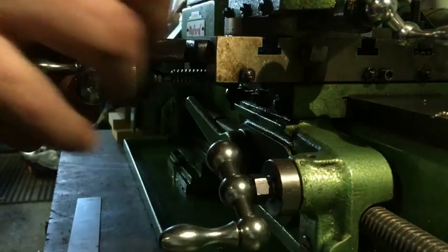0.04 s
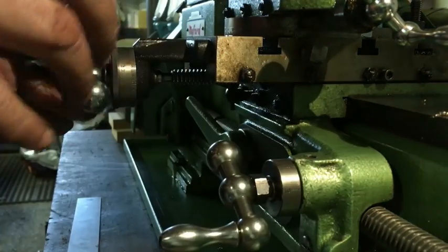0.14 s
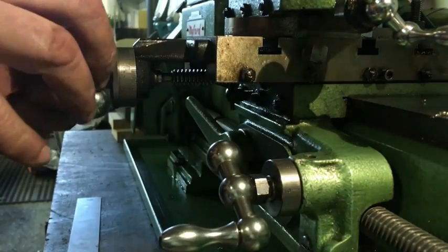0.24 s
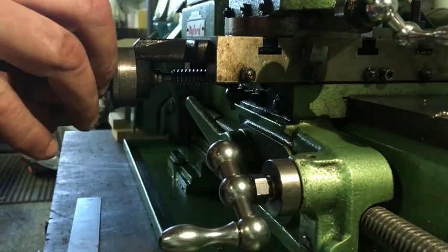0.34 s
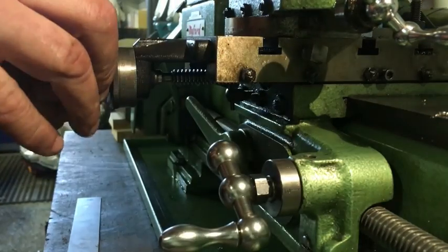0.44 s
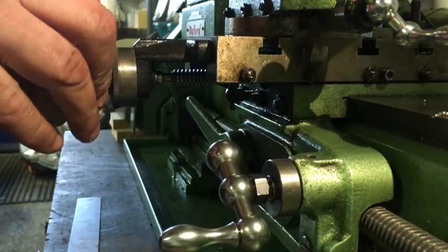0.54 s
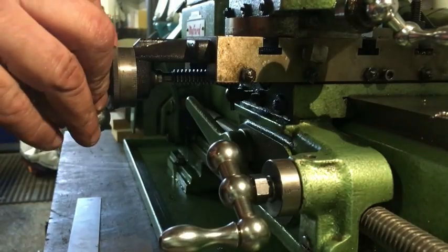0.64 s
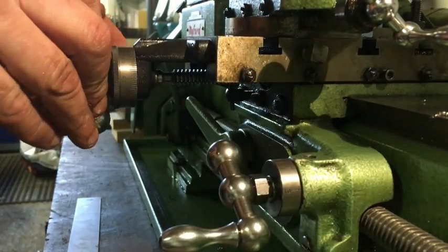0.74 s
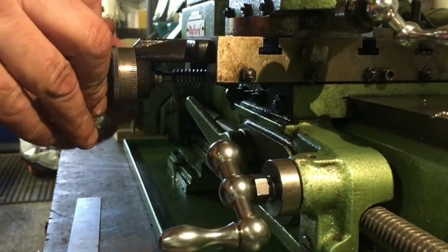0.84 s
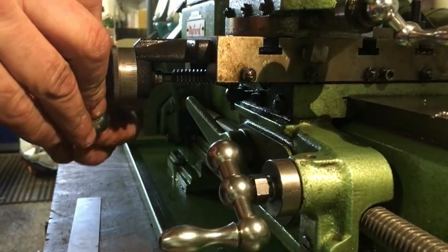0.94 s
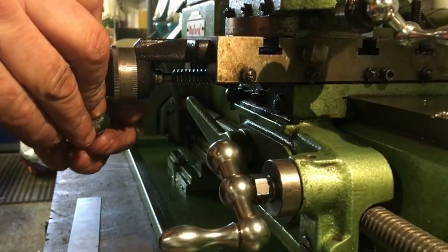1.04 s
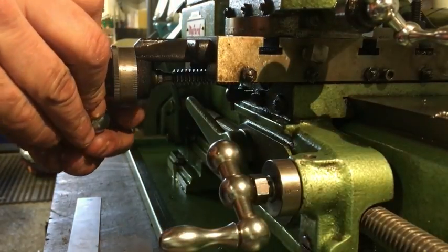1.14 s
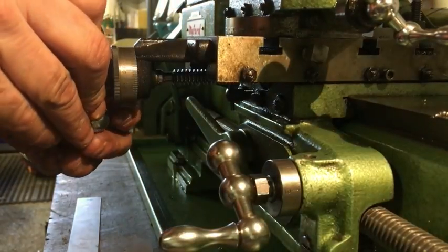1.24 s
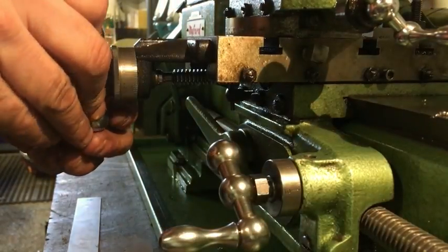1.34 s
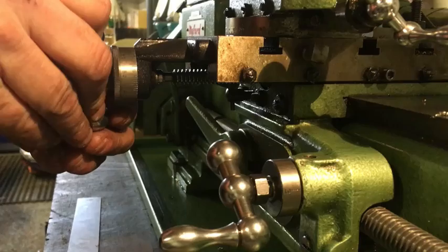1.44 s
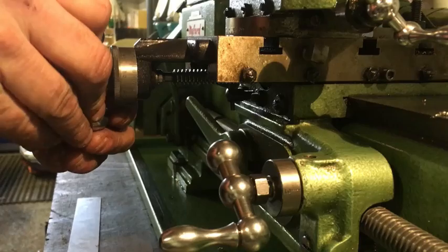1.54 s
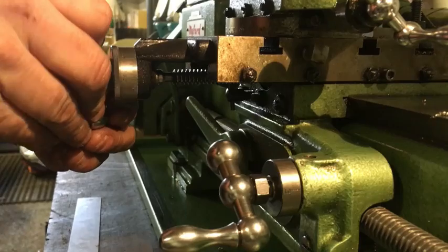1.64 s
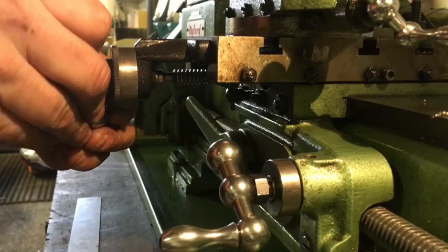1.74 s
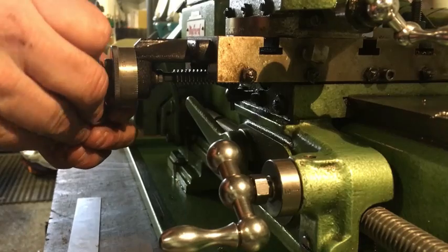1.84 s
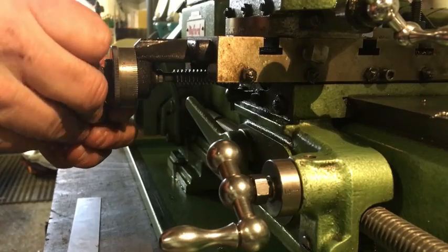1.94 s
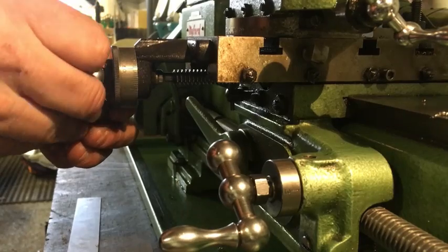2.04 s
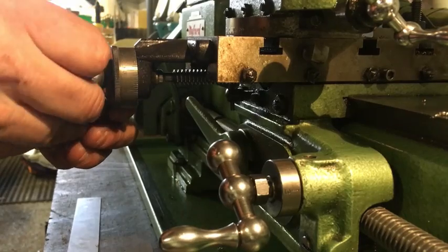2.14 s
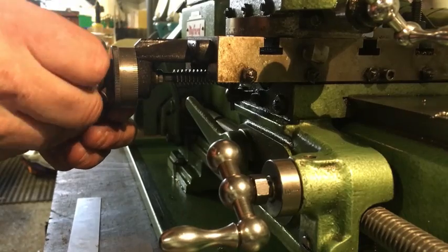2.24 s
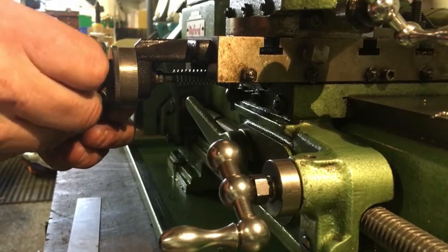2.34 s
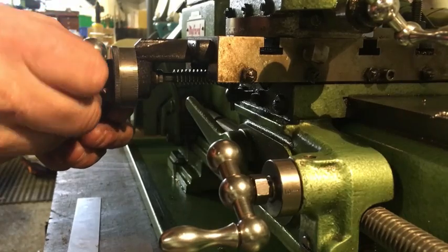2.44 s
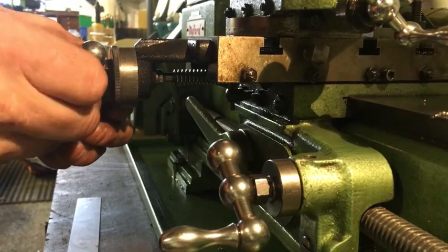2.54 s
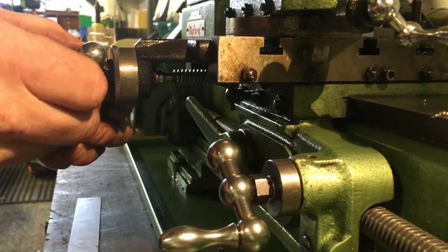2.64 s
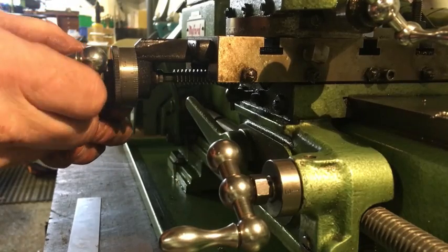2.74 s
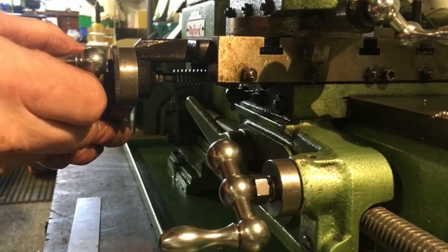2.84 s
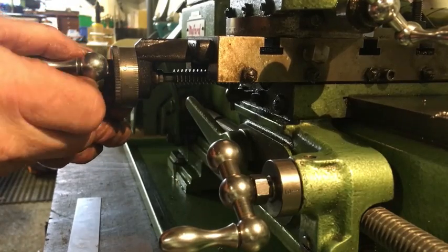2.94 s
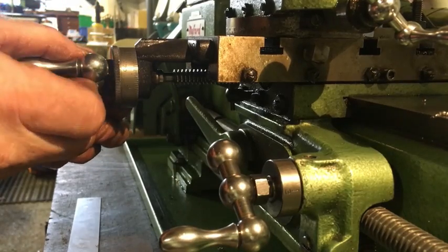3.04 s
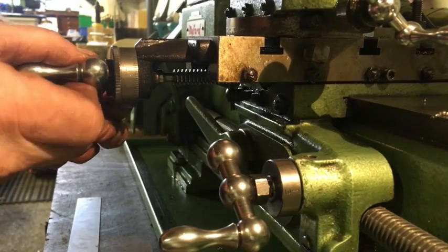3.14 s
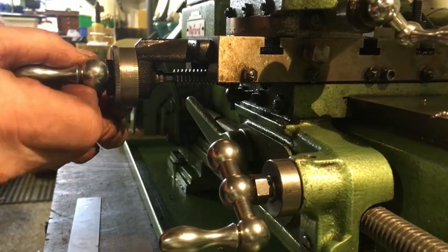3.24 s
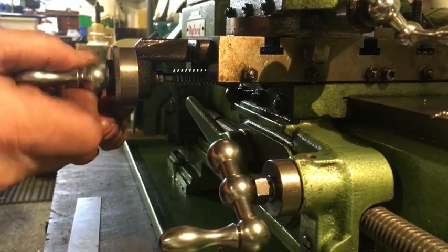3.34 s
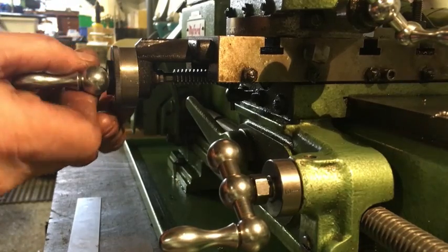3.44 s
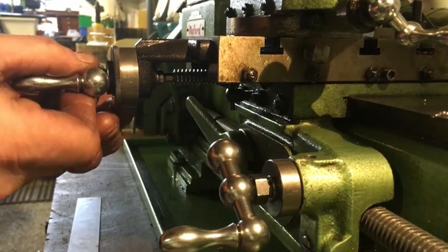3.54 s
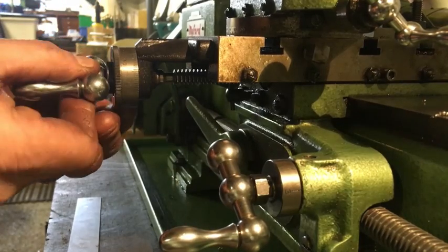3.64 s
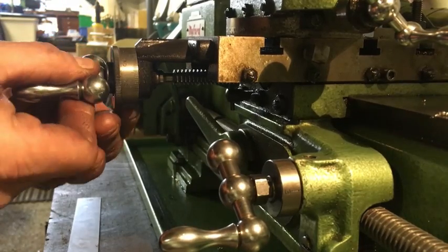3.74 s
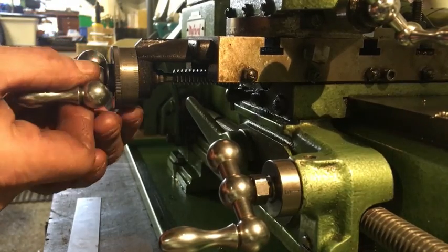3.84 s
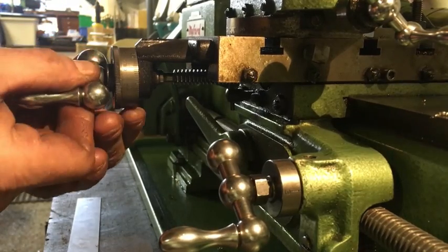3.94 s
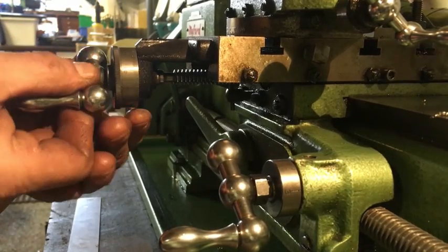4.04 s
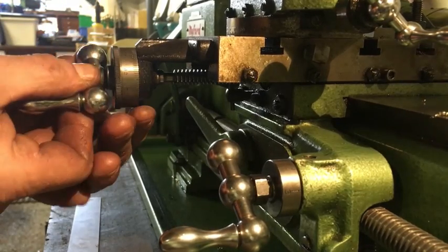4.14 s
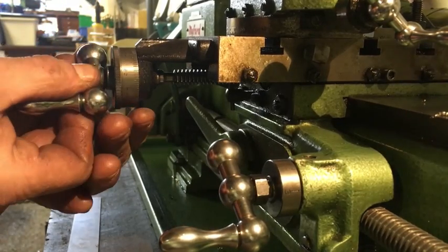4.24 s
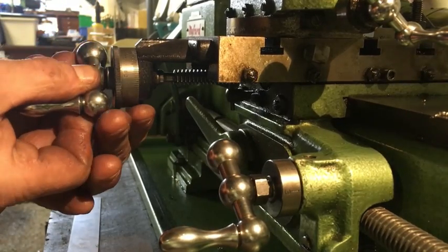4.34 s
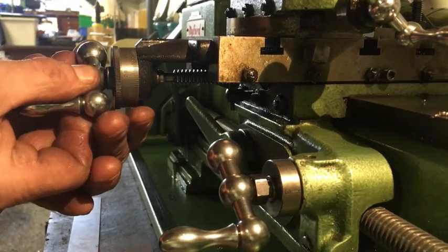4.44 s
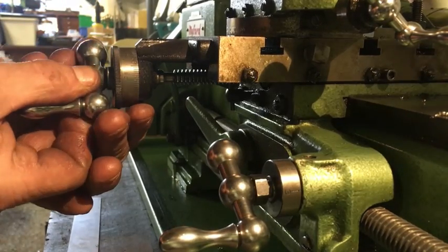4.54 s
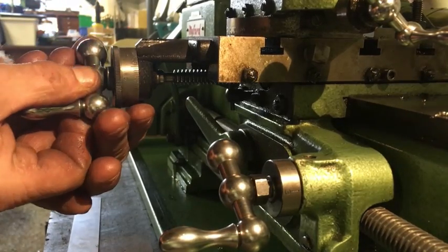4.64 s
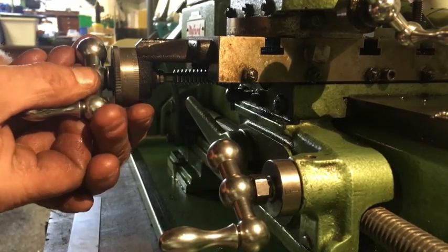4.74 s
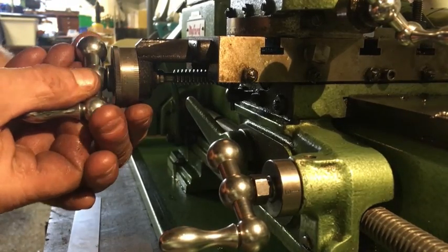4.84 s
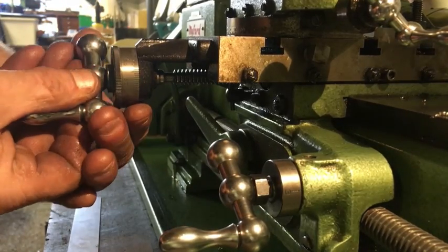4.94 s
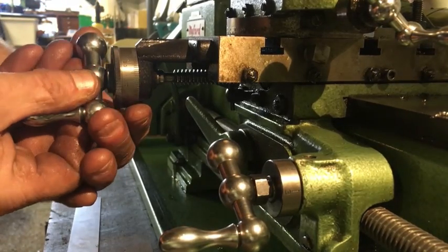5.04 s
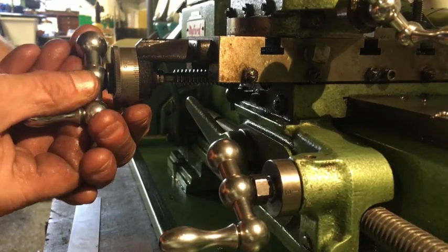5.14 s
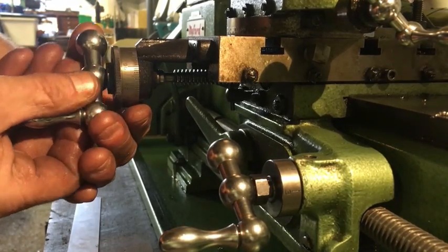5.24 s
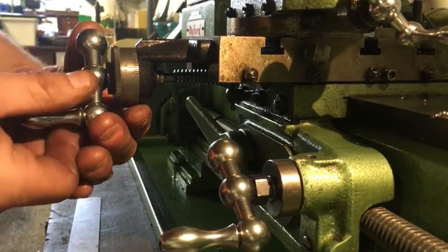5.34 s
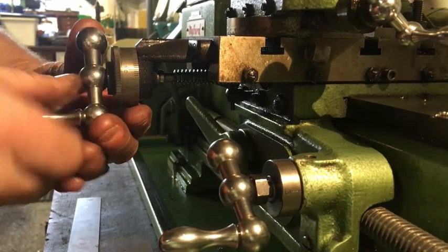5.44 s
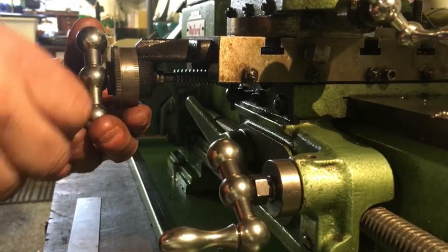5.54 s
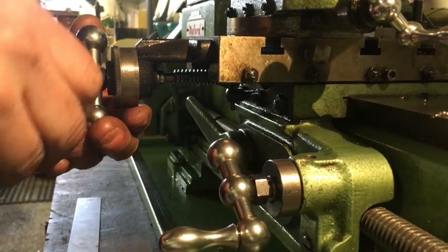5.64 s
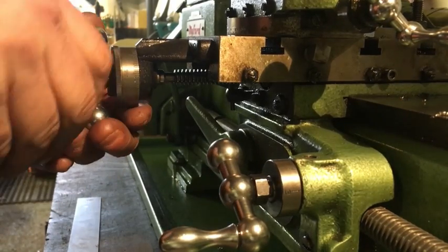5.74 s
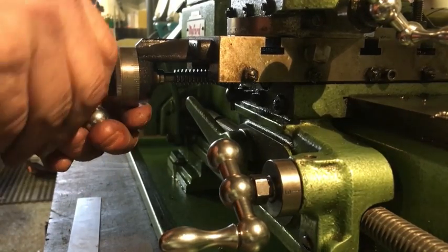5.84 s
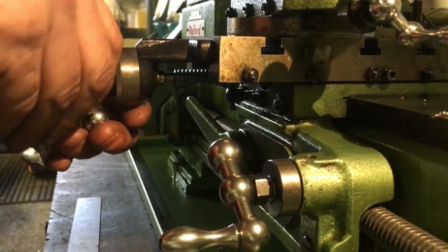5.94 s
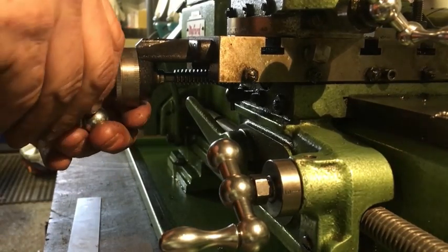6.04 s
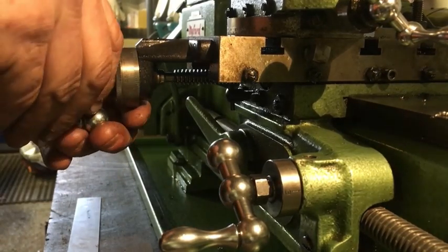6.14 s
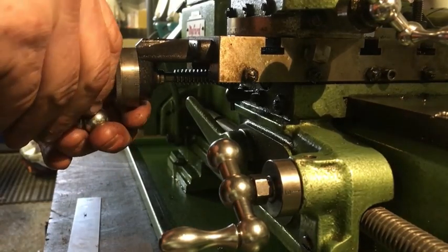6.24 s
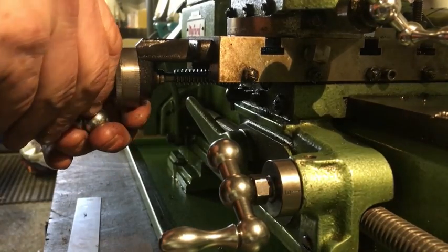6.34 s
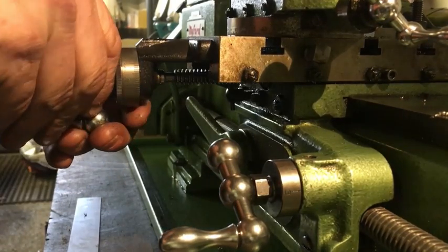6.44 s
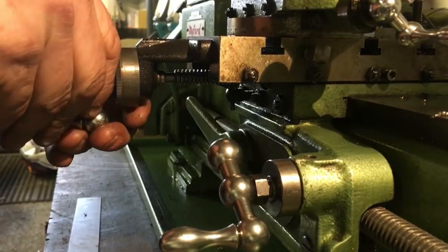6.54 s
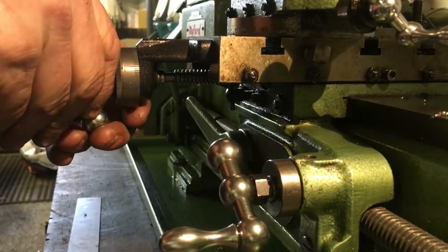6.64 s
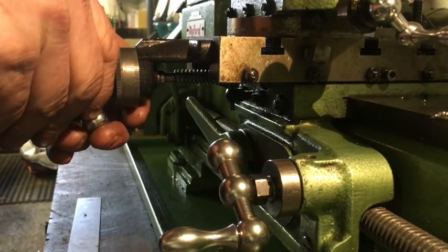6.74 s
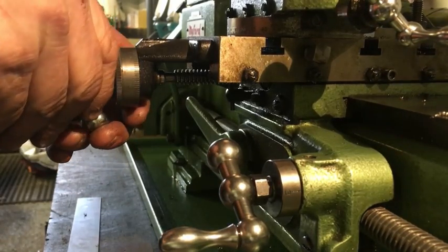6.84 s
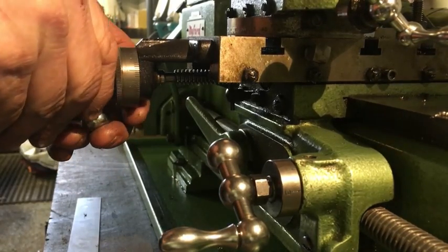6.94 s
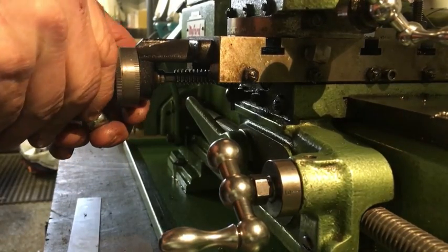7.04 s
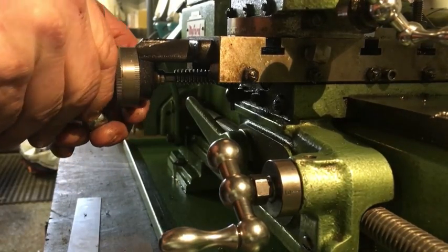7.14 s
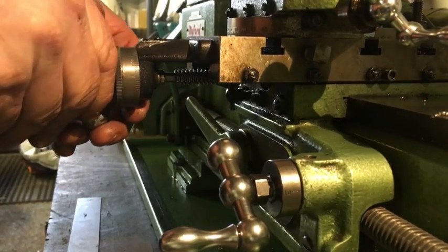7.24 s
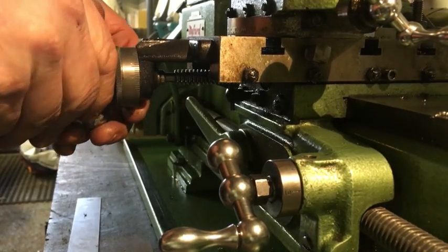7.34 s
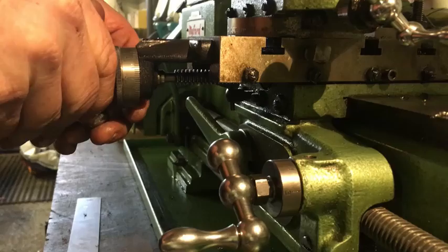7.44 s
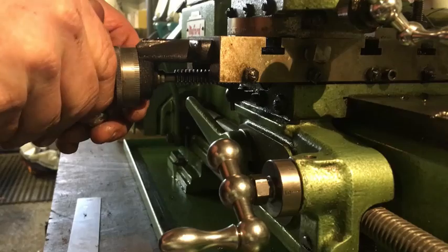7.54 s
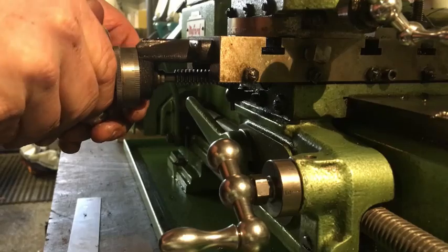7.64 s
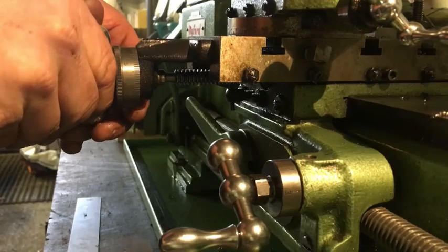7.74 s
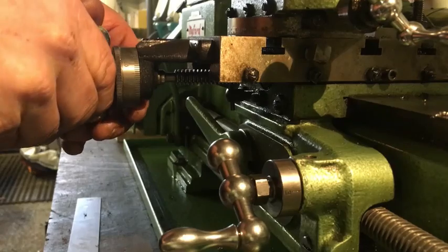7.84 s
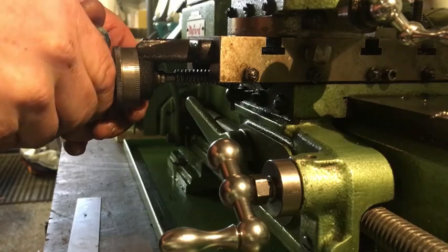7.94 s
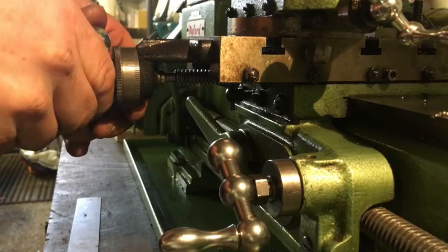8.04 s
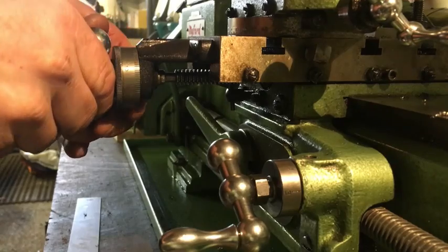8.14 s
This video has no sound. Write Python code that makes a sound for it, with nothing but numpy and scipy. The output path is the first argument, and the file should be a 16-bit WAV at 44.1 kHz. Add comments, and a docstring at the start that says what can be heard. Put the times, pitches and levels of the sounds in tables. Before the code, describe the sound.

A small metal lathe runs throughout, with a soft motor rumble, churning gears, a faint wavering whine and bearing hiss. At about 0.5 seconds the cutting tool starts catching a spinning steel bar once a turn, nearly five short bites a second. Each bite combines a low shudder, a rasping scrape, hiss and a shrill metallic ring. The bites grow louder by 1 second, then gradually lengthen. A curl of metal shaving brushes the bar with a thin hiss at about 2.3 and 3 seconds. Around 4 seconds the pulses merge into one steady, high-ringing cut that continues to the end at about 8 seconds. Tiny squeaks dot the cutting, and chips snap with small ticks around 5, 6.5 and 7.5 seconds. The microphone is close to the tool, and the small workshop adds only a very short echo.

```python
"""Motor and gears of a small lathe, running in a small workshop, the microphone close to the tool.
After half a second a hand slowly feeds the tool into an out-of-round steel bar. It bites only the high
side, once a turn; the bites lengthen and merge into one steady cut. The shearing chip shakes the bed,
scrapes, hisses, rings the tool near 6 kHz and now and then squeaks. Twice a curl of swarf brushes the
bar, and the walls give a short answer."""
import sys
import numpy as np
from scipy import signal
from scipy.fft import rfft, irfft, next_fast_len
from scipy.io import wavfile
from scipy.ndimage import map_coordinates

SR = 44100
rng = np.random.default_rng(int(sys.argv[2]) if len(sys.argv) > 2 else 0)


def file_out(sig):
    """Save sig as 16-bit WAV at sys.argv[1]."""
    # one column per channel
    cols = np.atleast_2d(sig).T
    # limit, then scale
    lim = np.clip(cols, -1, 1)
    pcm = np.round(lim * 32767).astype(np.int16)
    wavfile.write(sys.argv[1], SR, pcm)


N = 360738


def cutting(depth):
    """The chip shears off in dense slips, which drive the bed, the slide, the chip itself and the tool."""
    # load on the tool, as relative levels: time_s, shake_db, scrape_db, ring_db, upper_over_lower_db
    load = [(.54, -47, -41.5, -41, 0), (.72, -36.5, -45, -33, 2), (.96, -32, -40.5, -31, -2),
            (1.4, -32.5, -41, -31, -2.5), (2.05, -35, -41.5, -30.7, -4.5), (3.1, -34.5, -42.5, -32.5, -2),
            (4.2, -35, -42, -34, 1.5), (4.85, -34, -39.5, -32, 4), (5.5, -34, -40, -30.8, 4),
            (6.1, -36.5, -39.5, -32.5, 1), (7.1, -34.5, -39.2, -31.8, 2.5), (8.1, -35.5, -39, -33, .6)]
    shake_db, scrape_db, ring_db, upper_db = curves(load)
    jolt = chip_snaps()
    shear = slips(per_s=9000, spread_db=1.5) * amp(0.78 * wobble(130) + 0.25 * wobble(18))
    force = depth * shear
    return (bed_shake(shear, jolt, shake_db) + slide_scrape(force, jolt, scrape_db)
            + chip_hiss(force, scrape_db) + tool_ring(force, jolt, ring_db, upper_db))


def contact(linger_s=0, first_touch_s=.535):
    """Share of the full chip, 0-1: one bite a turn, ever longer until the bites join."""
    # the hand feeds the tool deeper (above 1 the bites overlap): time_s, share_of_turn_in_metal
    feed = [(.535, .005), (.728, .21), (.928, .27), (1.99, .47), (2.63, .61), (3.49, .75), (3.72, 0.86),
            (4.15, 1.01), (4.4, 1.2)]
    # the spindle slows a little under the cut: time_s, turn_s
    turns = [(.535, .193), (.728, .2), (.928, .212), (1.99, .212), (2.63, .219), (3.28, .214), (3.92, .217)]
    depth, start = np.zeros(N), first_touch_s
    while start < N / SR:
        turn_s = np.interp(start, *np.transpose(turns))
        bite_s = turn_s * np.interp(start, *np.transpose(feed))
        depth += window(start, start + bite_s + linger_s, attack_s=0.013, release_s=0.022)
        start += turn_s
    return np.minimum(depth, 1)


def slips(per_s, spread_db):
    """Tiny force steps at random moments and of random sizes, rms 1."""
    slipping = rng.random(N) < per_s / SR
    steps = slipping * rng.standard_normal(N) * amp(spread_db * rng.standard_normal(N))
    return steps / np.sqrt(np.mean(steps ** 2) + 1e-20)


def chip_snaps(decay_s=0.0062):
    """Force gained as the chip snaps off: it jumps and dies away."""
    # jolts of the cutting force: start_s, above_steady_db
    snaps = [(4.217, 6), (4.852, 9.5), (4.88, 7), (5.073, 7.5), (5.258, 7), (6.436, 9), (6.656, 6),
             (7.41, 8.5), (7.631, 9)]
    t = np.arange(N) / SR
    return sum((amp(db) - 1) * (t >= s) * np.exp(-np.abs(t - s) / decay_s) for s, db in snaps)


def tool_ring(force, jolt, ring_db, upper_db):
    """The tool is close to ringing by itself, so each group of its modes flares and sinks quickly."""
    # the tool's broad responses: frequency_hz, level_db
    lower_body = [(3500, -61.5), (4800, -23), (5200, -12.5), (5600, -4.5), (6200, 1), (6400, -3),
                  (6800, -22), (9000, -56.5)]
    upper_body = [(4500, -51), (6000, -20), (6400, -1), (6600, -0.5), (6880, -0.5), (7200, -10), (7500, -8),
                  (8200, -31.5), (11000, -54)]
    # its two groups of modes: pitch_hz, width_hz, rise_db
    lower_modes = [(5250, 70, 13.6), (5460, 96, 3.7), (5580, 87, 9.8), (5855, 67, 6), (6086, 87, 7.2),
                   (6250, 60, 2.9), (6500, 60, 5)]
    upper_modes = [(6260, 44, 3), (6560, 70, 10.6), (6780, 67, 3.8), (6700, 60, 5.6), (6920, 86, 7.1),
                   (7100, 70, 5.4), (7470, 93, 6.5)]
    flare = lambda: amp(ring_db - 0.5 + 1.73 * wobble(120))
    lean = np.arctan(amp(upper_db))  # the contact point shifts the ring between the groups
    lower = resonate(force * (1 + jolt) * flare() * np.cos(lean), lower_body, lower_modes)
    upper = resonate(force * flare() * np.sin(lean), upper_body, upper_modes)
    return lower + upper


def bed_shake(shear, jolt, shake_db):
    """The heavy bed answers a moment after the tool and shakes on briefly after each bite."""
    # the bed's broad response: frequency_hz, level_db
    body = [(40, -37), (150, -22.5), (200, -10.5), (260, -6.5), (350, 0.5), (450, -5.5), (600, -10.5),
            (750, -12), (1100, -38.5), (2500, -66)]
    # its resonances: pitch_hz, width_hz, rise_db
    modes = [(187.5, 33, 4), (241, 39, 10.5), (313.4, 31, 3.5), (351, 56, 1.5), (390, 41, 8),
             (480, 34, 4.5), (536, 29, 4), (574, 39, 5)]
    force = contact(linger_s=0.0065) * shear * (1 + 0.52 * jolt)
    gain = amp(shake_db + .7 * wobble(9) + 1.48 * wobble(55))
    return later(resonate(force * gain, body, modes), delay_s=0.00503)


def slide_scrape(force, jolt, scrape_db):
    """The cutting force sounds through the slide as a midrange scrape."""
    # the slide's broad response: frequency_hz, level_db
    body = [(300, -20.5), (600, -3.5), (760, 2), (930, 2), (1100, 1.5), (1260, -1), (1700, -4), (2400, -1),
            (3100, -3), (4200, -1.5), (5000, -1.5), (6000, -27.5), (9000, -43.5)]
    # its resonances: pitch_hz, width_hz, rise_db
    modes = [(955, 130, 3), (1149, 77, 12.6), (1602, 95, 9.2), (1857, 80, 9.3), (2010, 115, 4.2),
             (2468, 124, 6.3), (2712, 142, 10.7), (2861, 66, 10.7), (3304, 84, 8.5), (3513, 150, 7),
             (3840, 320, 9.8), (4420, 73, 9.1), (4660, 86, 6.6)]
    gain = amp(scrape_db - .5 + 1.11 * wobble(35))
    return resonate(force * (1 + jolt) * gain, body, modes)


def chip_hiss(force, scrape_db):
    """The chip hisses; early copies off the carriage comb its colour at the microphone."""
    # the chip's broad response: frequency_hz, level_db
    body = [(4000, -39), (6800, -11), (7500, -2.5), (8800, 1), (9900, 1), (10700, 0), (11300, -3.5),
            (12600, -4.5), (13700, -14.5), (14500, -12), (15100, -5), (15700, -8)]
    # its resonances: pitch_hz, width_hz, rise_db
    modes = [(7800, 110, 5.4), (8120, 150, 6.4), (8530, 95, 6.5), (8800, 88, 1.9), (9150, 150, 6.7),
             (9430, 320, 9.1), (10045, 260, 7.2), (10400, 190, 4.7), (11980, 290, 8.6), (12300, 200, 7.6),
             (13070, 250, 6)]
    # reflections off nearby steel faces: delay_s, level_db
    faces = [(.00175, -11), (.00245, -10), (.00286, -14), (.0052, -14)]
    gain = amp(-28.5 + .28 * scrape_db + 0.71 * wobble(30))
    hiss = resonate(force * gain, body, modes)
    return hiss + sum(amp(db) * later(hiss, s) for s, db in faces)


def tip_squeaks(depth, per_s=2.2):
    """Loud, brief squeaks at set moments, and weaker ones at random while the tool is in the metal."""
    # the tip's loud squeaks: peak_s, relative_db, pitch_hz, length_s
    loud = [(.734, -23, 6770, 0.0051), (.951, -17, 5940, 0.0033), (.975, -24.5, 6210, 0.016),
            (1.575, -24, 6450, .0056), (1.611, -19, 6090, .006), (1.785, -24, 6441, .0056),
            (2.069, -21.5, 5820, .0091), (2.464, -22, 6040, 0.0045), (4.003, -24, 6000, .006),
            (4.883, -25, 6500, 0.0071), (5.543, -20.5, 6060, 0.0051), (6.123, -20.5, 6130, 0.0066),
            (6.219, -22.5, 6130, .0042), (6.66, -20, 6380, .0038), (7.386, -24, 6130, .005),
            (7.734, -24, 6310, .0056)]
    loud_squeaks = stick_slip(loud)
    count = round(per_s * N / SR)
    peak_s = np.sort(rng.random(count)) * N / SR
    level, pitch, length = rng.standard_normal((count, 3)).T
    weak = np.transpose([peak_s, -29.5 + 2 * level, 6300 * np.exp(0.047 * pitch),
                         .0055 * np.exp(.35 * length)])
    return loud_squeaks + depth * stick_slip(weak)


def stick_slip(rows, waver=0.015, octave_db=-21, trim_db=-2.05):
    """The tip sticks and slips in step with its own ring for a few dozen cycles."""
    t = np.arange(N) / SR
    peak_s, level_db, pitch_hz, length_s = np.transpose(rows)
    swell = np.zeros(N)
    for s, db, span in zip(peak_s, level_db, length_s):
        near = slice(max(0, int((s - .03) * SR)), int((s + .03) * SR))
        swell[near] += amp(db) * np.exp(-2 * ((t[near] - s) / (span + 0.0007)) ** 2)
    hz = np.interp(t, peak_s, pitch_hz) * (1 + waver * wobble(600))
    phase = 2 * np.pi * np.cumsum(hz) / SR
    return amp(trim_db) * np.sqrt(2) * swell * (np.sin(phase) + amp(octave_db) * np.sin(2 * phase))


def swarf(fade_s=.015):
    """A loose curl of swarf hisses and sings thinly while it rubs the turning bar."""
    # the curl touches and lets go: start_s, end_s, level_db
    brushes = [(2.34, 2.364, -43.5), (2.93, 3.07, -42)]
    # its broad response: frequency_hz, level_db
    body = [(3000, -42), (5400, -14), (6500, 4), (7600, -8), (9500, -6), (11000, -8), (12400, -6),
            (13200, -24), (15700, -30)]
    # its resonance: pitch_hz, width_hz, rise_db
    modes = [(12060, 450, 14)]
    rub = sum(amp(db) * window(start, end, fade_s, fade_s) for start, end, db in brushes)
    return resonate(rub * amp(1.2 * wobble(90)) * rng.standard_normal(N), body, modes)


def drive_train():
    """Under the cut the motor rumbles, the bearings hiss, the gears churn and whine a little unsteadily."""
    # noise colours of motor, gears and bearings: frequency_hz, relative_db
    motor = [(20, -20), (32, -13), (48, -4), (82, -2), (113, -0.5), (145, -10.5), (220, -27), (600, -70)]
    gears = [(120, -32.5), (185, 0), (280, -9.5), (380, 4), (450, -5), (570, -2.5), (820, -10), (1350, -11),
             (1700, -20), (2200, -11), (3000, -17), (3600, -13.5), (4900, -22.5), (7000, -54)]
    bearings = [(4000, -44), (5100, -16), (5750, 0.5), (6450, -2.5), (7350, 1.5), (7750, -11), (8400, -8),
                (9500, -6), (10700, -19), (11900, -10), (12500, -18), (15700, -24)]
    # tones of the running machine: pitch_hz, level_db
    whines = [(113, -64.5), (245, -63), (391, -56), (581, -58), (1998, -65), (2153, -65), (3618, -70),
              (5662, -63), (5912, -59.5), (7236, -72), (7382, -57.5), (8000, -78)]
    t = np.arange(N) / SR
    rumble = amp(-53) * resonate(rng.standard_normal(N), motor)
    churn = amp(-49.5 + wobble(14)) * resonate(rng.standard_normal(N), gears)
    hiss = amp(-49 + 0.72 * wobble(29)) * resonate(rng.standard_normal(N), bearings)
    whine = sum(amp(db + 1.7 * wobble(12)) * np.sin(2 * np.pi * hz * t + 0.43 * wobble(14))
                for hz, db in whines)
    return rumble + churn + hiss + whine


def workshop(x):
    """The walls' short answer, 5 ms behind the direct sound and dying faster in the treble."""
    # the room's decay: frequency_hz, t60_s
    decay = [(100, 0.3), (400, 0.25), (2000, 0.063), (12000, 0.12)]
    hz, t, noise = signal.stft(rng.standard_normal(SR // 2), SR, nperseg=256)
    tail = signal.istft(noise * amp(-60 * t / along(decay, hz)[:, None]), SR, nperseg=256)[1]
    return signal.fftconvolve(x, np.pad(tail / np.linalg.norm(tail), (SR // 200, 0)))[:N]


def resonate(x, body, modes=(), size=8192):
    """x through a causal body of unit energy: a broad response with resonances rising above it."""
    hz = np.fft.rfftfreq(size, 1 / SR)
    db = along(body, hz) + sum(rise / (1 + (2 * (hz - f) / width) ** 2) for f, width, rise in modes)
    cepstrum = irfft(np.log(amp(db)))
    cepstrum[1:size // 2] *= 2  # fold onto positive time: minimum phase
    cepstrum[size // 2 + 1:] = 0
    response = irfft(np.exp(rfft(cepstrum)))
    return signal.fftconvolve(x, response / np.linalg.norm(response))[:N]


def amp(db):
    """Decibels to gain."""
    return 10 ** (np.asarray(db) / 20)


def along(points, hz):
    """(Hz, value) points interpolated on a log frequency axis."""
    knots_hz, values = np.transpose(points)
    return np.interp(np.log(hz + 1), np.log(knots_hz), values)


def curves(rows):
    """One value per sample for each column after the time."""
    time_s, *columns = np.transpose(rows)
    return [np.interp(np.arange(N) / SR, time_s, column) for column in columns]


def wobble(rate):
    """A smooth random curve, rate knots a second."""
    knots = rng.standard_normal(int(N * rate / SR) + 4)
    return map_coordinates(knots, [np.arange(N) * rate / SR], mode="nearest")


def window(start, end, attack_s, release_s):
    """0-1 envelope: a straight rise around start, a hold, a straight fall around end."""
    t = np.arange(N) / SR
    return np.clip(np.minimum((t - start) / attack_s, (end - t) / release_s) + .5, 0, 1)


def later(x, delay_s):
    """x delayed."""
    return np.pad(x, (round(delay_s * SR), 0))[:N]


def scene():
    """The cut close by, its echo off the walls, and the running machine, in mono."""
    depth = contact()
    cut = cutting(depth) + tip_squeaks(depth) + swarf()
    return (cut + amp(-9.5) * workshop(cut) + drive_train())[None]


def record(dry, top_hz=15760):
    """The microphone channel keeps nothing above its band limit."""
    size = next_fast_len(N + SR // 2)
    passband = np.fft.rfftfreq(size, 1 / SR) < top_hz
    return irfft(rfft(dry, size) * passband, size)[..., :N]


dry = scene()
out = record(dry)
file_out(out)
```